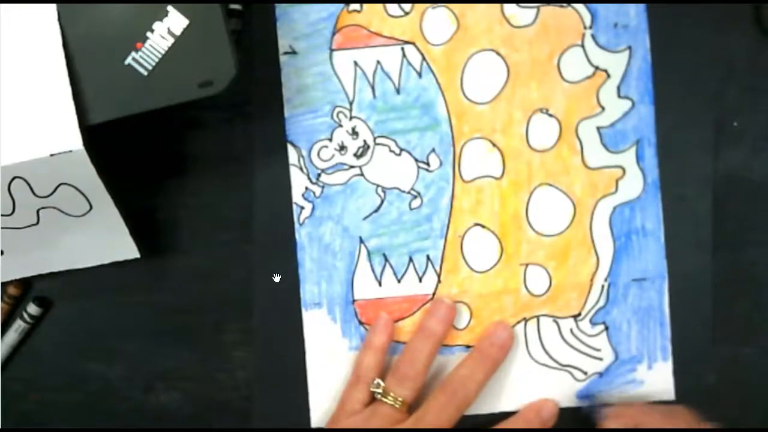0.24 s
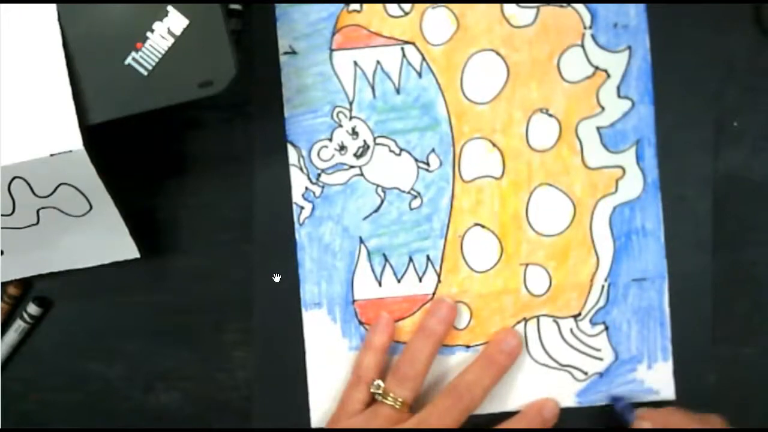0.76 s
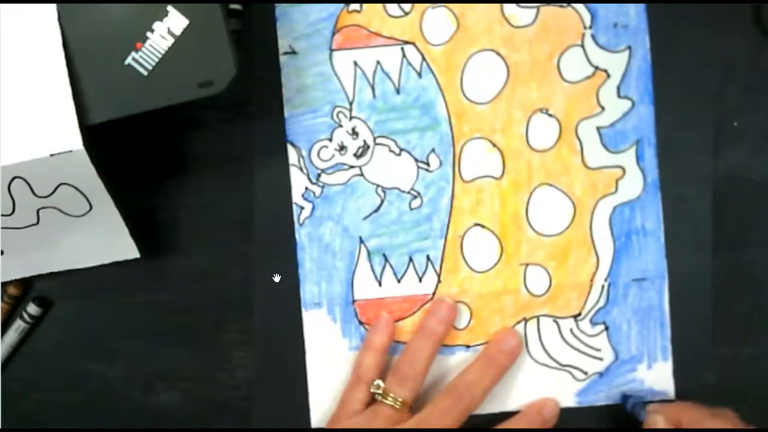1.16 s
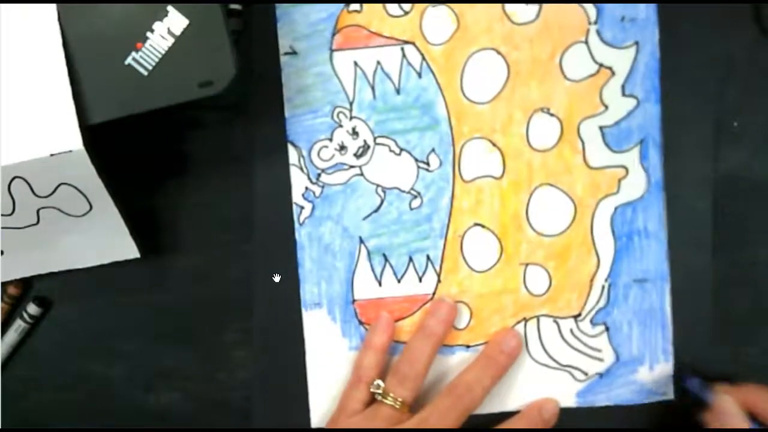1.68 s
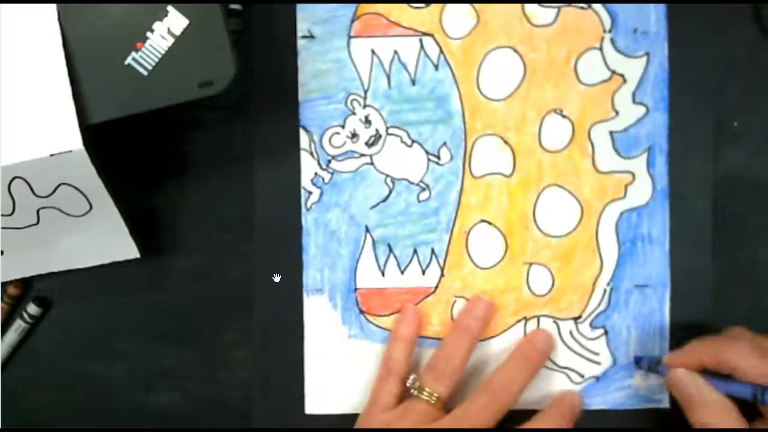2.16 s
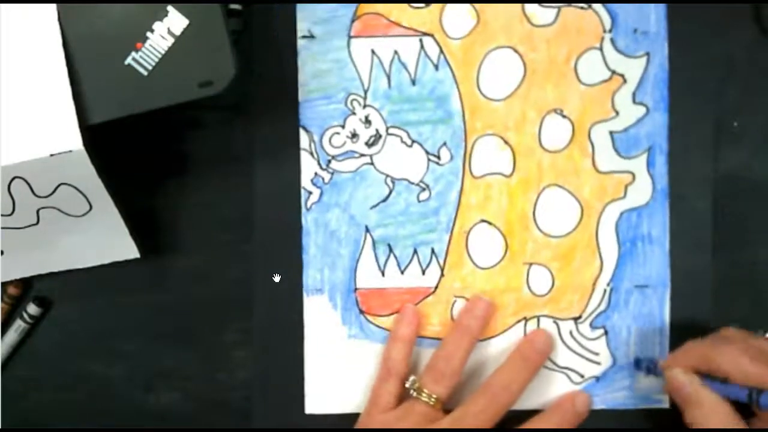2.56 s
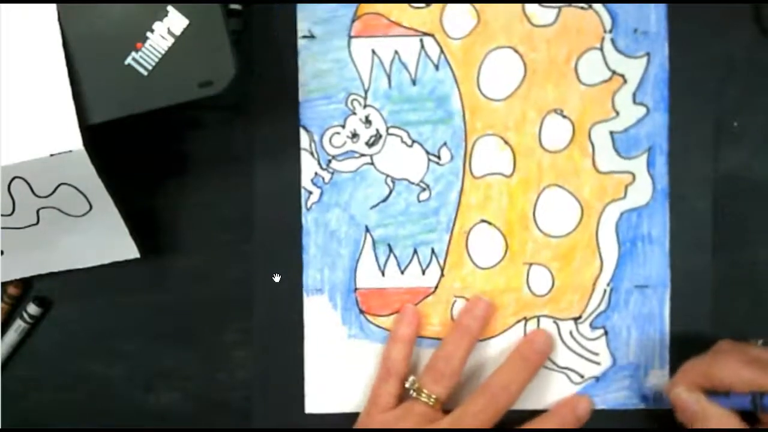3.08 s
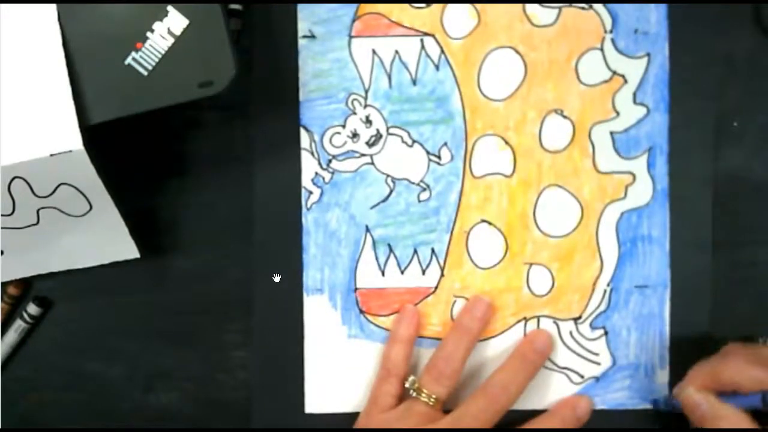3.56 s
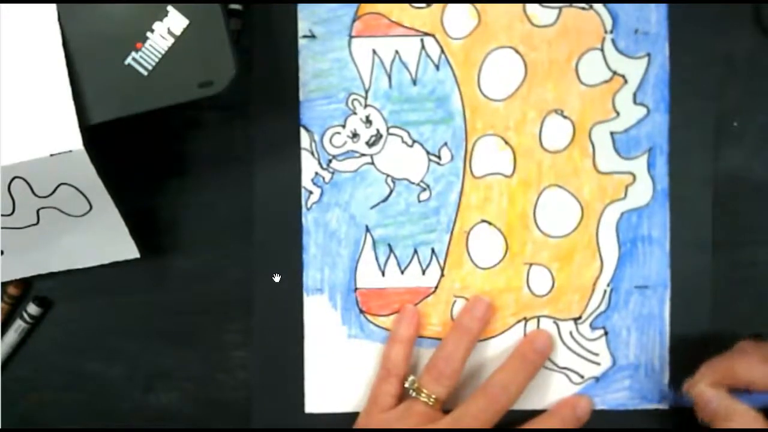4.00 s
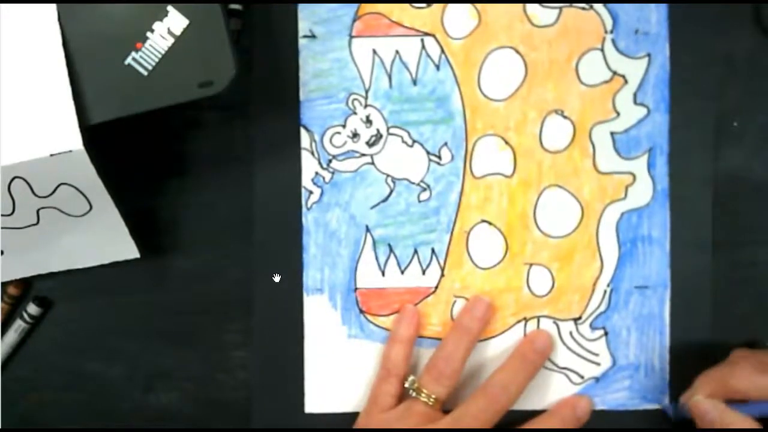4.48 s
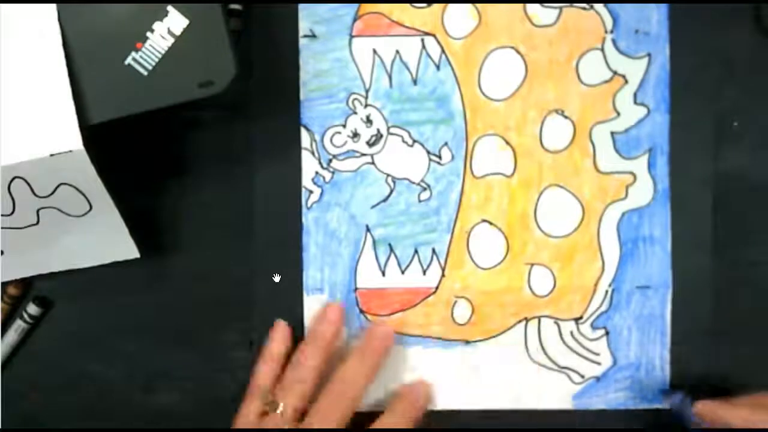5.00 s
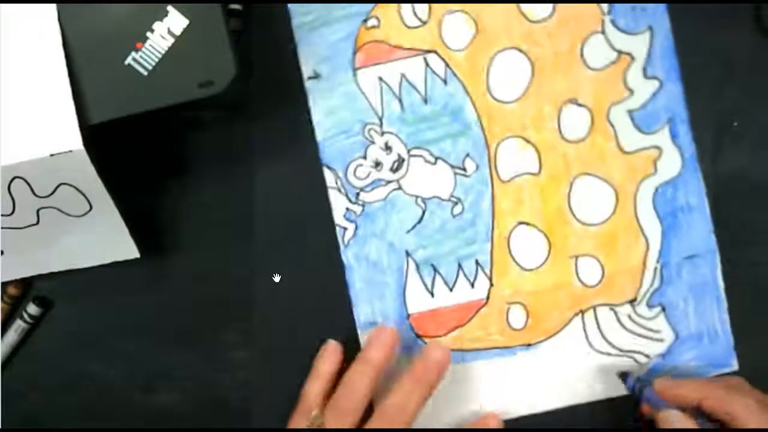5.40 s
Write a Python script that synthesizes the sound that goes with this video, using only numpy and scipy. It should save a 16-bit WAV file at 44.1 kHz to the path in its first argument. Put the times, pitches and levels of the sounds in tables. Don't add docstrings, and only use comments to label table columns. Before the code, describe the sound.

A wax crayon rubs paper in quick hollow strokes on a desk, squeaks at the edge, knocks twice, then the sheet slides round over low hum.

```python
import sys
import numpy as np
from scipy import signal
from scipy.fft import rfft, irfft, next_fast_len
from scipy.io import wavfile
from scipy.ndimage import uniform_filter1d, map_coordinates

SR = 44100
rng = np.random.default_rng(int(sys.argv[2]) if len(sys.argv) > 2 else 0)


def magnitude_from_level(level_db):
    exponent = np.asarray(level_db, float) / 20
    return 10 ** exponent


def log_audio(samples):
    frames = np.atleast_2d(samples).T
    limited = np.clip(frames, -1, 1)
    pcm = np.round(limited * 32767).astype(np.int16)
    wavfile.write(sys.argv[1], SR, pcm)


N = 248713
T = np.arange(N) / SR

# start in seconds, length in seconds, pressure in dB, high desk tones in dB against the low ones.
SWEEPS = [(0.0, .135, -70, -7.5), (.143, 0.032, -58.5, 7), (0.158, 0.065, -57.5, 3),
          (0.249, 0.1, -74, -3.5), (0.308, 0.082, -71, -4.5), (0.404, .02, -51.5, -7),
          (0.424, .025, -52.5, -12), (0.434, 0.058, -58.5, 5.5), (0.535, 0.11, -71.5, -1),
          (0.607, 0.048, -71, 7), (0.677, 0.043, -60, -6.5), (0.706, 0.063, -76, 9.5),
          (0.796, 0.09, -62.5, -10.5), (0.914, 0.057, -51.5, -2), (0.997, .088, -70, -6.5),
          (1.062, 0.12, -81, 11), (1.115, 0.039, -55, -4.5), (1.2, 0.099, -68.5, -3.5),
          (1.311, 0.03, -53, -6), (1.328, 0.04, -53, 1.5), (1.387, 0.037, -70.5, 3.5),
          (1.403, 0.071, -60.5, -3.5)]
# start in seconds, pressure in dB, high desk tones in dB against the low ones.
SCRIBBLE = [(1.968, -78, -13), (2.071, -76.5, -7), (2.185, -66.5, -6.5), (2.282, -68.5, -5.5),
            (2.39, -72, -9.5), (2.498, -73, -7.5), (2.618, -72.5, -9), (2.724, -71, -10), (2.835, -68, -6),
            (2.944, -73.5, -5), (3.055, -70, -7), (3.168, -69, -12), (3.277, -64.5, -10),
            (3.384, -69, -8.5), (3.486, -68.5, -7), (3.595, -69.5, -7.5), (3.704, -65.5, -6),
            (3.815, -73, -6), (3.916, -66, -9), (4.036, -76.5, -7.5), (4.154, -71, -8)]
# start in seconds, length in seconds, pressure in dB, high desk tones in dB against the low, hiss in dB.
ODD_STROKES = [(1.491, 0.039, -46, -7.5, -85), (1.519, 0.099, -67.5, -6, -84.5),
               (1.531, 0.032, -62.5, 4.5, -75.5), (1.594, 0.069, -67.5, -10.5, -81.5),
               (1.73, 0.17, -86, -9, -96.5), (1.853, 0.13, -88.5, 3.5, -95),
               (3.021, 0.021, -63.5, -14, -102), (4.096, 0.028, -66, -10.5, -93),
               (4.269, 0.1, -70, -8.5, -98), (4.36, 0.065, -64.5, -7, -94),
               (4.422, 0.023, -42, -18.5, -95.5), (4.485, 0.11, -62, -24, -104),
               (4.614, 0.11, -75, -5, -99), (4.672, 0.17, -81, -16, -104), (5.442, 0.071, -78, -11, -94.5),
               (5.53, 0.18, -89, -3, -104)]
# pitch in Hz, width in Hz, level in dB.
DESK_THUD = [(250, 110, -4.5), (416, 100, 0), (517, 67, -4), (1603, 120, -17), (2085, 130, -24.5)]
DESK_LOW = [(562, 71, -3.5), (665.8, 51, 4), (741.6, 39, -2), (840, 113, -7)]
DESK_HIGH = [(864.4, 43, -11.5), (931, 88, -13.5), (984, 50, -7.5), (1078.7, 68, -3.5), (1145, 68.4, -1.5),
             (1220, 65, -13)]
# pitch in Hz, width in Hz, level in dB.
HOUSING = [(1520, 540, -5.5), (2385, 210, -2), (3625, 280, -10.5), (5126, 400, -8), (5855, 480, -6),
           (7810, 1000, -10), (9440, 180, -11.5), (11000, 200, -7.5)]
HOUSING_PEAK = [(5290, 300, 0)]
# time in seconds, gain in dB.
PEAK_GAIN = [
    (0, -3.5),
    (1.6, -4),
    (1.8, 5.5),
    (5.64, 11),
]
# peak in seconds, rise in seconds, fall in seconds, edge tones in dB, bright edge tones in dB.
SQUEAK = [
    (1.485, 0.013, 0.022, -79, -82),
    (1.516, 0.0086, 0.008, -52.5, -65),
    (1.53, 0.027, 0.0068, -54, -57),
    (1.543, 0.012, 0.0016, -50, -67),
    (1.56, 0.013, 0.015, -69, -100),
    (1.594, 0.0085, 0.007, -70, -93),
    (1.618, 0.003, 0.003, -61.5, -78),
    (1.628, .006, .007, -67.5, -82),
    (1.642, 0.0086, 0.005, -73, -90),
]
# pitch in Hz, width in Hz, level in dB.
EDGE_LOW = [(1900, 500, -20), (2250, 300, -12), (2450, 110, -2), (2650, 250, -8), (2870, 190, -1),
            (3100, 200, -16)]
EDGE = [(3400, 150, -14), (3550, 170, 0), (3720, 170, -2), (4020, 160, -8)]
EDGE_BRIGHT = [(5190, 250, -15), (5900, 500, -16), (7750, 90, 2), (7300, 900, -24), (8600, 900, -26),
               (9860, 250, -25), (10900, 400, -24), (12750, 200, -12), (13900, 170, -20),
               (15000, 1500, -34)]
# time in seconds, speed given as hiss in dB.
SLIDE = [
    (4.97, -103),
    (4.996, -97),
    (5.028, -77),
    (5.068, -84.5),
    (5.142, -75.5),
    (5.21, -78),
    (5.224, -81),
    (5.34, -103),
    (5.36, -104),
]
# pitch in Hz, width in Hz, level in dB.
SHEET = [(2340, 220, -5.5), (3600, 73, -3), (5300, 220, 1), (6070, 430, -9), (7600, 500, -8),
         (9640, 130, -5), (10600, 610, -12), (13100, 1500, -21)]
# peak in seconds, rise in seconds, fall in seconds, level in dB.
SWING = [
    (5.155, 0.064, 0.027, -74),
]
# pitch in Hz, width in Hz, level in dB.
CORNER = [(2370, 60, -4), (4060, 110, 0)]
# time in seconds, peak in dB, ring in dB against the peak, first pitch in Hz.
TAPS = [(.186, -52.5, 0, 527), (.428, -47.5, 11, 480), (.942, -51, -1, 560), (1.14, -47.5, -15, 546),
        (1.496, -53, -9, 496), (2.822, -62.5, -4, 400), (3.026, -61.5, -6, 400), (4.114, -58.5, 1, 400),
        (4.404, -44.5, -12, 485), (4.419, -45.5, -6.5, 480), (4.4446, -30, 6, 370), (4.5542, -29, 5, 352),
        (5.029, -62.5, -14, 302)]
# pitch in Hz, level in dB, time to fade 60 dB in seconds, rise in seconds.
TAP_MODES = [(410, -20, .04, .005), (495, -20, .11, .01), (745, -11, .045, .008), (1060, -22, .04, .004),
             (1150, -13, .05, .004), (2390, -50, .04, .002)]
# time in seconds, peak in dB, pitch in Hz.
BUMPS = [(0.4, -66, 200), (0.677, -66, 190), (0.896, -60, 156), (1.457, -53.5, 165), (1.494, -48.5, 128),
         (1.624, -57.5, 328), (2.095, -58.5, 192), (2.822, -68, 308), (3.024, -64.5, 250),
         (3.703, -63.5, 200), (4.112, -66, 250), (4.446, -54.5, 204), (4.556, -67, 198),
         (5.025, -58.5, 194), (5.031, -56.5, 302), (5.058, -65, 221)]
# time in seconds, peak in dB, pitch in Hz.
TICKS = [
    (1.351, -75.5, 6600),
    (5.021, -78, 5300),
    (5.046, -76, 3600),
    (5.445, -79, 5300),
    (5.47, -80.5, 2690),
]
# multiple of the mains pitch, level in dB, share of the ducking.
OVERTONES = [(2, -18, 0.68), (3, -40, 0.98), (4, -36, 0.34), (5, -51, 0.37)]
# centre in seconds, length in seconds.
DUCKS = [(0.114, 0.19), (0.524, 0.219), (1.105, 0.074), (1.313, 0.069), (1.428, 0.071), (1.558, 0.101),
         (1.649, 0.1), (1.892, 0.077), (2.359, 0.22), (2.785, 0.197), (3.392, 0.145), (3.727, 0.073),
         (3.933, 0.076), (4.055, 0.071), (4.237, 0.081), (4.31, 0.075), (4.659, 0.22), (5.109, 0.145)]
# pitch in Hz, level in dB per Hz.
RUMBLE = [(15, -3), (28, 5.5), (45, -4), (160, -10.5), (420, -28.5), (1150, -36), (1400, -42), (2500, -64)]
HISS = [(600, 7.5), (1500, -1.5), (6500, -4), (12500, -5), (13700, -0.5), (14600, -7.5), (15600, -6.5)]
# pitch in Hz, width in Hz, level in dB.
WHINES = [(4403, 290, -102), (7970, 9.6, -104), (11100, 50, -108), (12200, 46, -112)]


def crayon():
    rows = strokes()
    low, high, _ = swells(rows, bite=2.6, fade=1.7)
    thud = magnitude_from_level(-79.5) * (low / magnitude_from_level(-69.0)) ** 0.39
    force = slips(1500, spread_db=1.5, smooth=0.6) * magnitude_from_level(1.5 * wobble(60))
    desk = excite(force, thud, DESK_THUD)
    desk += excite(force, low, DESK_LOW)
    desk += excite(force, high, DESK_HIGH)

    middles = [(s, 0.93 * rise, 0.77 * fall, hiss_db) for s, rise, fall, *_, hiss_db in rows]
    hiss, = swells(middles, bite=2.0, fade=1.8)
    rub = slips(3400, spread_db=2.0, smooth=0.89)
    peak_db, = curves(PEAK_GAIN)
    paper = excite(rub, magnitude_from_level(4.5) * hiss, HOUSING)
    paper += excite(rub, magnitude_from_level(peak_db - 3.5) * hiss, HOUSING_PEAK)
    return desk + paper


def strokes():
    wide = []
    for s, long, db, high_db in SWEEPS:
        hiss_db = -90 - 0.2 * np.log2(long / 0.06)
        wide.append((s, long, db, high_db, hiss_db))
    quick = []
    for s, db, high_db in SCRIBBLE:
        hiss_db = -89.5 + 0.5 * (db + 69.5)
        quick.append((s, 0.073, db, high_db, hiss_db))
    rows = []
    for group, share in [(wide + ODD_STROKES, 0.54), (quick, 0.52)]:
        for s, long, db, high_db, hiss_db in group:
            rise = share * long
            rows.append((s + rise, rise, long - rise, db, db + high_db, hiss_db))
    return rows


def squeak():
    edge, bright = swells(SQUEAK, bite=4.1, fade=1.7)
    force = slips(2300, spread_db=4.5, smooth=0.86)
    low = magnitude_from_level(-60) * (edge / magnitude_from_level(-53.5)) ** 1.2
    return excite(force, low, EDGE_LOW) + excite(force, edge, EDGE) + excite(force, bright, EDGE_BRIGHT)


def slide():
    hiss_db, = curves(SLIDE)
    desk_db = np.minimum(hiss_db + 1, -80)
    swing, = swells(SWING, bite=2.7, fade=1.1)
    rub = slips(4000, spread_db=0.0, smooth=0.46)
    out = excite(rub, swing, CORNER)
    out += excite(rub, magnitude_from_level(hiss_db), SHEET, order=1)
    out += excite(rub, magnitude_from_level(desk_db), DESK_LOW[2:] + DESK_HIGH)
    out += excite(rub, magnitude_from_level(desk_db - 7), DESK_LOW[:2])
    return out


def knocks():
    out = np.zeros(N + SR)
    t = T[:SR // 4]

    sides = np.zeros(len(t))
    for hz, db, t60, rise in TAP_MODES:
        sides += magnitude_from_level(db - 60 * t / t60) * (1 - np.exp(-t / rise)) ** 2 * np.sin(2 * np.pi * hz * t)
    for s, db, ring_db, first_hz in TAPS:
        ring = magnitude_from_level(ring_db - 60 * t / 0.065) * (1 - np.exp(-t / 0.01)) ** 2
        main = (push(t, 0.0037) ** 2.9 + ring) * glide(t, first_hz, 662, 0.0044)
        add(out, s, magnitude_from_level(db) * (main + sides))

    for s, db, hz in BUMPS:
        thump = push(t, 0.91 / hz) * glide(t, 0.82 * hz, 1.82 * hz, 4.7 / hz)
        rattle = 0.16 * push(t, 0.0086) * band_noise(len(t), hz, 900)
        add(out, s, magnitude_from_level(db) * (thump + rattle))

    for s, db, hz in TICKS:
        snap = push(t, 0.0024) * band_noise(len(t), hz * 0.85, hz * 1.2)
        add(out, s, magnitude_from_level(db) * snap)
    return out[:N]


def hum():
    duck_db = ducking()
    turn = 2 * np.pi * 60.012 * T + 0.027 * wobble(5)
    out = magnitude_from_level(duck_db + 0.5 * wobble(18)) * np.sin(turn + 2.8)
    for multiple, db, share in OVERTONES:
        level = magnitude_from_level(share * duck_db + db + 2.1 * wobble(15))
        out += level * np.sin(round(multiple) * turn + 0.24 * wobble(15))
    return np.sqrt(2) * magnitude_from_level(-47.5) * out


def ducking():
    centre, long = np.transpose(DUCKS)[:, :, None]
    step = T[::32]
    inside_s = long / 2 - np.abs(step - centre)
    depth_db = np.clip(166 * inside_s, 0, 9).max(0)
    return -uniform_filter1d(np.interp(T, step, depth_db), 900)


def room_floor():
    out = magnitude_from_level(-65.5 + 0.54 * wobble(10)) * coloured(RUMBLE)
    out += magnitude_from_level(-85) * coloured(HISS)
    for hz, width, db in WHINES:
        whine = filtered(rng.standard_normal(N), resonances([(hz, width, 0)]))
        out += magnitude_from_level(db) * unit(whine)
    return out


def slips(rate, spread_db, smooth):
    when = rng.random(N)
    size = rng.exponential(size=N)
    rub = rng.standard_normal(N)
    grains = (when < rate / SR) * magnitude_from_level(spread_db * size) * np.sign(rub)
    return unit(grains) + smooth * rub


def excite(force, envelope, modes, order=2):
    body = resonances(modes, order)
    return filtered(force * envelope, body) / np.std(filtered(force, body))


def resonances(modes, order=2):
    def response(f):
        total = 0
        for k, (hz, width, db) in enumerate(modes):
            peak = 1j * f * width / (hz * hz - f * f + 1j * f * width)
            total = total + (-1) ** k * magnitude_from_level(db) * peak ** order
        return total
    return response


def filtered(x, response):
    m = next_fast_len(N + 8192)
    return irfft(rfft(x, m) * response(np.fft.rfftfreq(m, 1 / SR)), m)[:N]


def swells(rows, bite, fade):
    s, rise, fall, *levels = np.transpose(rows)[:, :, None]
    step = T[::32]
    before = np.abs((s - step) / rise) ** bite
    after = np.abs((step - s) / fall) ** fade
    away = np.minimum(np.where(step < s, before, after), 12)
    envelopes = []
    for db in levels:
        power = np.sum(magnitude_from_level(db - 10.1 * away) ** 2, 0)
        envelopes.append(np.interp(T, step, np.sqrt(power)))
    return envelopes


def curves(rows):
    s, *columns = np.transpose(rows)
    return [np.interp(T, s, column, left=-150, right=-150) for column in columns]


def wobble(rate):
    return map_coordinates(rng.standard_normal(int(N * rate / SR) + 4), [T * rate])


def push(t, peak):
    return (t / peak * np.exp(1 - t / peak)) ** 2


def glide(t, start_hz, end_hz, settle):
    return np.sin(2 * np.pi * (end_hz * t - (end_hz - start_hz) * settle * (1 - np.exp(-t / settle))))


def band_noise(length, low_hz, high_hz):
    band = signal.butter(2, [low_hz, high_hz], "bandpass", fs=SR, output="sos")
    return unit(signal.sosfilt(band, rng.standard_normal(length)))


def coloured(spectrum):
    hz, db = np.transpose(spectrum)
    colour = lambda f: magnitude_from_level(np.interp(np.log(f + 1), np.log(hz + 1), db))
    return unit(filtered(rng.standard_normal(N), colour))


def unit(x):
    return x / np.sqrt(np.mean(x ** 2) + 1e-30)


def add(out, s, sound):
    out[round(s * SR):][:len(sound)] += sound


def scene():
    mix = crayon() + squeak() + slide() + knocks() + hum() + room_floor()
    return mix[None]


def roll_off(x):
    return signal.sosfilt(signal.butter(12, 15600, fs=SR, output="sos"), x)


def record(dry):
    return roll_off(dry)


dry = scene()
out = record(dry)
log_audio(out)
```